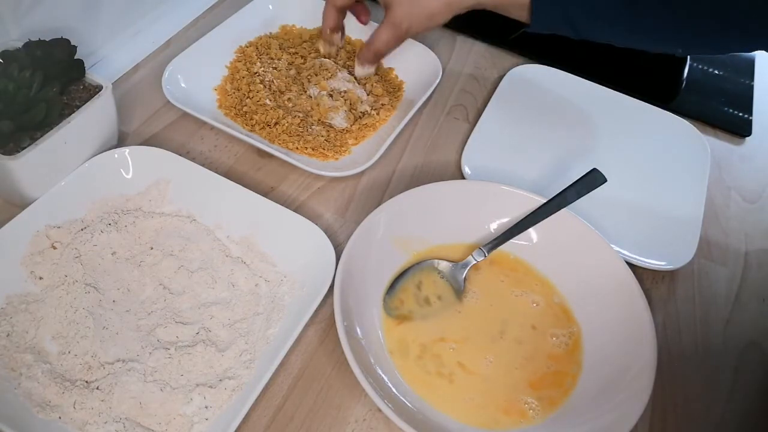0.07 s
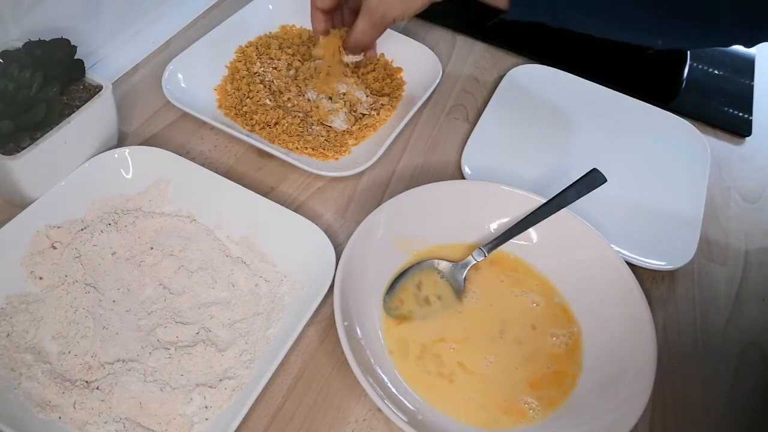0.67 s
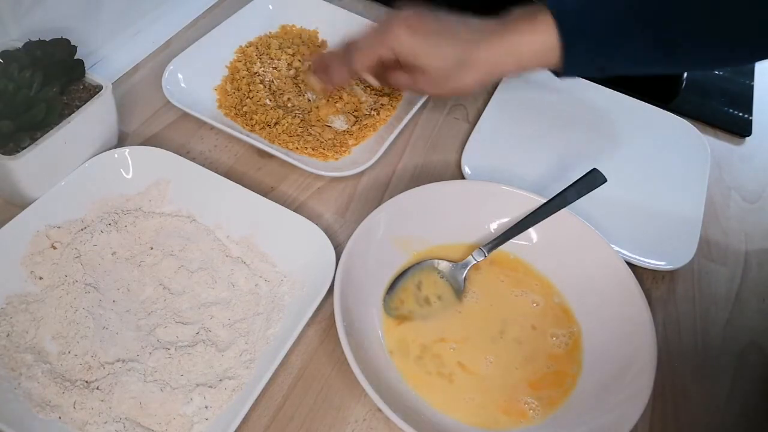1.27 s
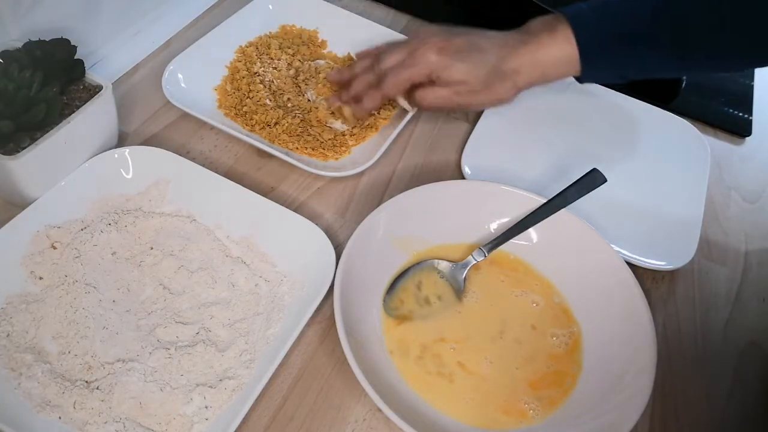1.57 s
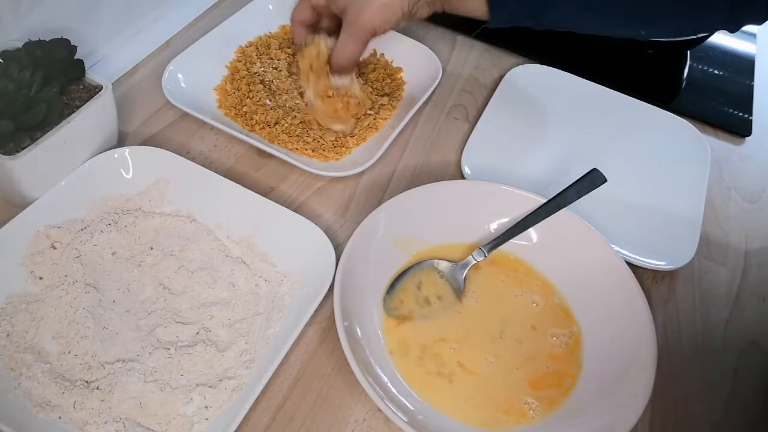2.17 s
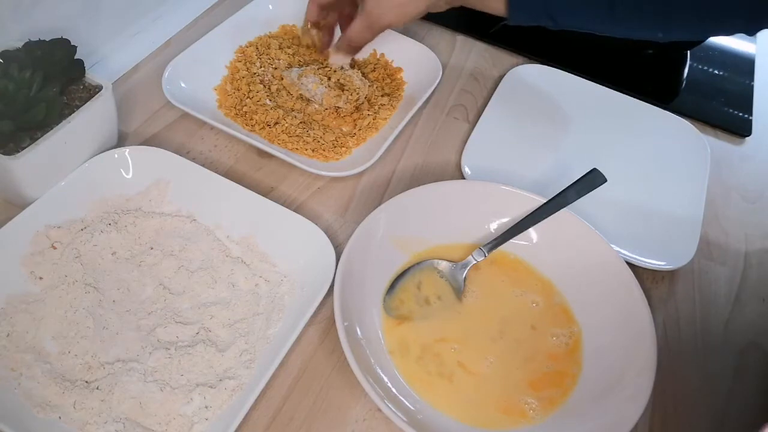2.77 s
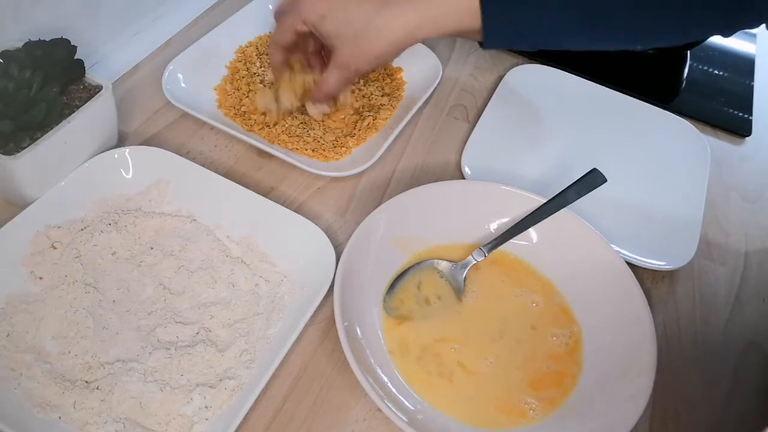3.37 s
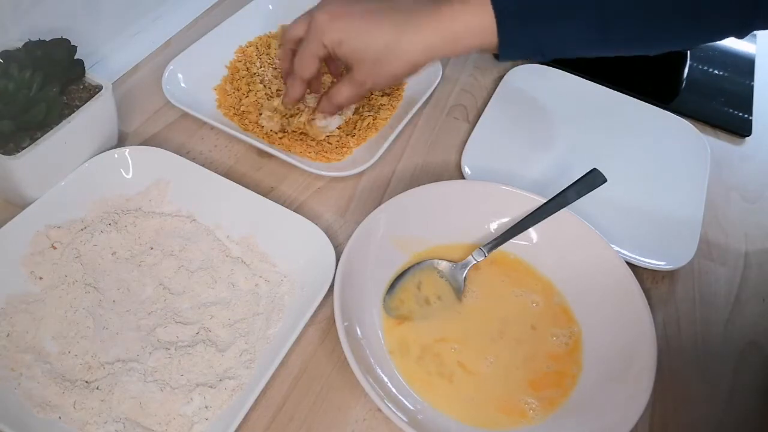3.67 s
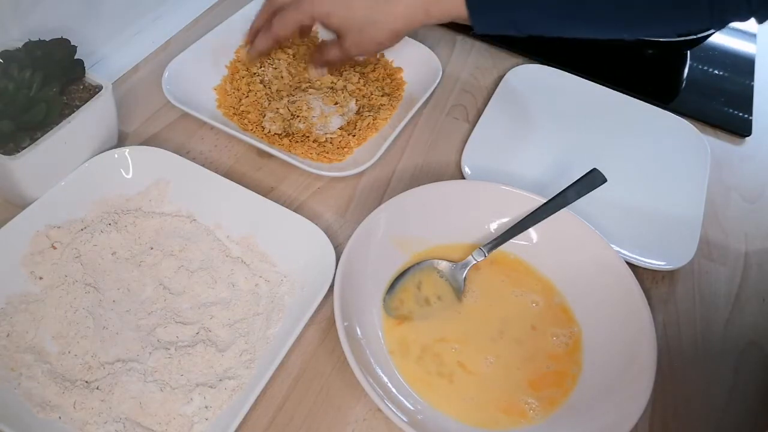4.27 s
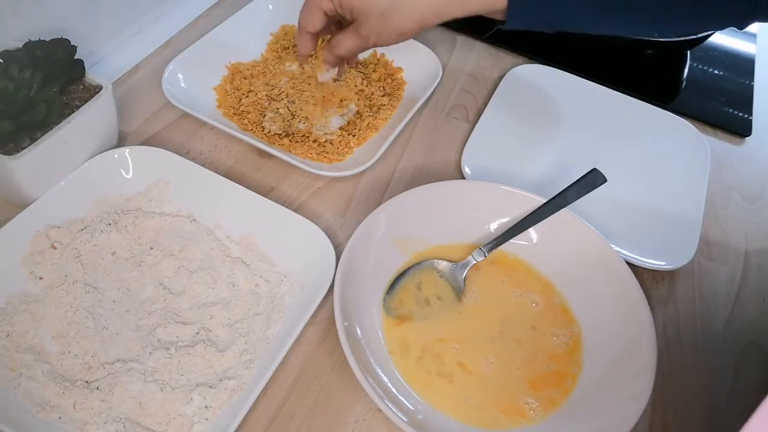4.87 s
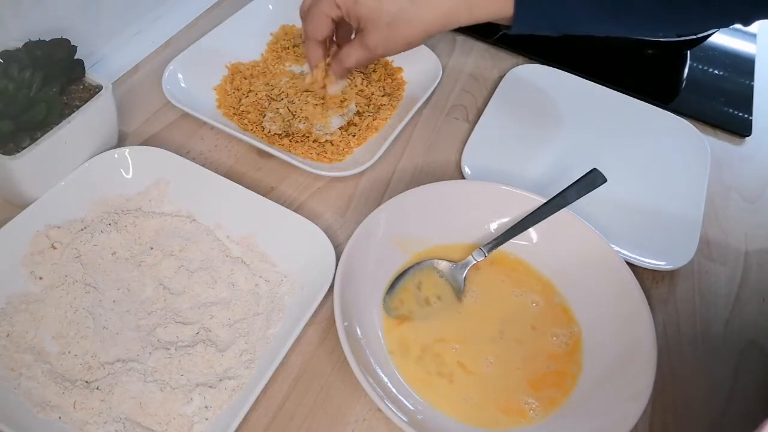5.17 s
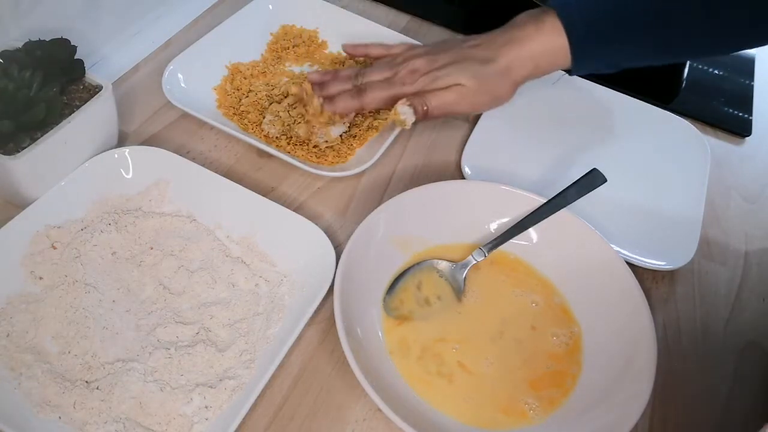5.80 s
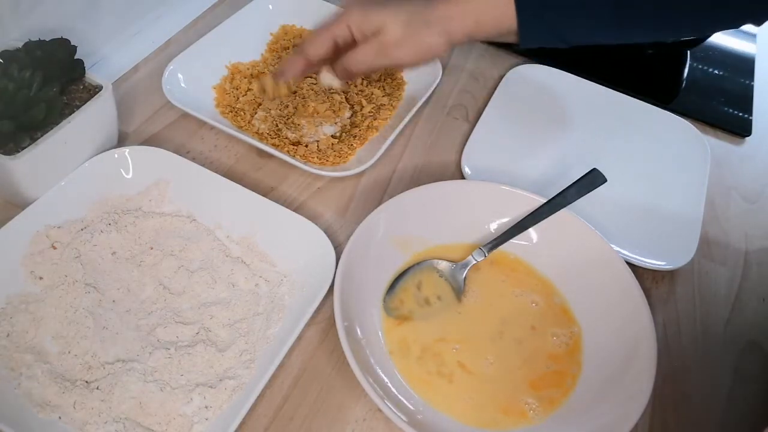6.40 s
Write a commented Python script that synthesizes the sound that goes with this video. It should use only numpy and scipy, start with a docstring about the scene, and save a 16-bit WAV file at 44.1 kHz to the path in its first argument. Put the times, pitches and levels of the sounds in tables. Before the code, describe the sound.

In a small kitchen, a low electrical hum and fan noise continue throughout. Nearby, dry crumbs crackle quietly as meat is pushed and turned in them, lightly scraping and ringing a china plate. Loose crumbs trickle back between pushes, with a longer, ticking sprinkle past the middle. Near the end come a few firmer pats and a soft, dull thud.

```python
"""Dry crumbs crackle as a hand turns pieces of chicken in them on a china plate.
Each push crushes crumbs and rings the plate; loose crumbs trickle back with a finer hiss,
and the meat bumps dully. The hard walls of a small kitchen scatter the crackle.
Underneath: appliance hum, a faint electronic whine and fan rush."""
import sys
import numpy as np
from scipy import signal
from scipy.fft import rfft, irfft, next_fast_len
from scipy.io import wavfile
from scipy.ndimage import map_coordinates

SR = 44100
rng = np.random.default_rng(int(sys.argv[2]) if len(sys.argv) > 2 else 0)


def bounce(signal):
    """Save signal as a 16-bit WAV file at the path given by the first command-line argument."""
    frames = np.transpose(np.atleast_2d(signal))
    limited = np.clip(frames, -1, 1)
    pcm = np.round(limited * 32767).astype(np.int16)
    wavfile.write(sys.argv[1], SR, pcm)


N = 288414

# breaking crumbs (frequency [Hz], gain [dB])
CRUSH_SPECTRUM = [(300, -0.5), (700, -3.5), (1150, -9.5), (1500, -6.5), (2100, -1), (2800, -1), (3700, 1),
                  (4200, -3.5), (4700, 0.5), (6000, 0.5), (8000, -5.5), (11000, -12), (15000, -21)]
# falling crumbs (frequency [Hz], gain [dB])
TRICKLE_SPECTRUM = [(1500, -21), (4200, -9.5), (5500, -6), (7300, -1.5), (8700, -3.5), (10500, -1),
                    (11800, -5.5), (13000, -8.5), (15000, -12)]
def crumbs(crush_db, trickle_db):
    """Crumbs break and trickle down; harder work gives more impulses per second."""
    crush = coloured(fractures(9000 * amp(0.6 * (crush_db + 60)), spread_db=3.5), CRUSH_SPECTRUM)
    dust = fractures(12000 * amp(0.6 * (trickle_db + 58.5)), spread_db=5)
    whole_crumbs = fractures(250, spread_db=-2)
    trickle = coloured(dust + amp(-7.5) * whole_crumbs, TRICKLE_SPECTRUM)
    clumps_db = 1.04 * wobble(70)  # crumbs give way in clusters
    return amp(crush_db + clumps_db + 3.5) * crush + amp(trickle_db + clumps_db + 2) * trickle


# pushes, grabs, pats (start [s], rise [s], hold [s], crush [dB], trickle [dB], ring [dB])
PUSHES = [(0.01, 0.036, 0.03, -53, -53.5, -59.5), (0.369, .14, 0.071, -55.5, -52, -62),
          (1.405, 0.015, 0.07, -64.5, -60, -70.5), (1.562, 0.028, 0.005, -59, -56.5, -66),
          (1.918, 0.02, 0.069, -59, -59, -65), (2.003, 0.046, .05, -61, -59.5, -70),
          (2.122, 0.021, .03, -55.5, -53.5, -57), (2.502, 0.016, 0.085, -62.5, -59, -60.5),
          (2.99, 0.046, .11, -61, -63, -64), (3.194, 0.025, 0.062, -60.5, -61.5, -68.5),
          (3.374, 0.015, 0.019, -63, -64, -73), (3.42, 0.058, 0.026, -59.5, -58, -62),
          (3.726, 0.047, 0.013, -56.5, -56.5, -59), (3.847, 0.03, .02, -76, -70, -73.5),
          (3.995, 0.029, 0.013, -59.5, -59.5, -64), (4.395, 0.034, 0.073, -55.5, -53.5, -52),
          (4.489, 0.032, 0.056, -53.5, -50, -52.8), (4.926, 0.023, 0.028, -65, -51.5, -87),
          (5.696, 0.11, 0.015, -53.5, -55.5, -57), (5.997, 0.021, 0.032, -59, -57.5, -61.5),
          (6.192, 0.032, 0.01, -55.5, -53.3, -59), (6.366, 0.014, 0.024, -59.5, -63.5, -62)]
# crumbs running off a lifted piece (start [s], length [s], level [dB])
SPILLS = [(0.605, 0.3, -61.5), (0.854, 0.26, -61), (2.202, .28, -64), (3.29, 0.076, -69), (3.554, .15, -69),
          (4.566, 0.45, -57.5), (5.074, 0.1, -65), (5.259, 0.2, -66.5)]
def hand():
    """Crush, trickle and ring levels in dB: resting fingers, pushes and spills add in power."""
    resting_db, spill_mix_db = (-81.5, -86, -89), (-7.5, 0, -25)
    ring_lag_s = 0.013  # fingers reach the china late
    power = np.outer(amp(resting_db) ** 2, np.ones(N))
    for start_s, rise_s, hold_s, crush_db, trickle_db, ring_db in PUSHES:
        press = stroke(start_s, rise_s, hold_s, release_db_per_s=330)
        settle = amp(-9.5) * stroke(start_s, rise_s, hold_s, release_db_per_s=133)
        work = np.maximum(press, settle)
        grind = stroke(start_s + ring_lag_s, rise_s, hold_s, release_db_per_s=229)
        power += np.array([amp(crush_db) * work, amp(trickle_db) * work, amp(ring_db) * grind]) ** 2
    spill_rise_s = 0.044
    for start_s, length_s, db in SPILLS:
        flow = amp(db) * stroke(start_s, spill_rise_s, length_s - spill_rise_s, release_db_per_s=94)
        power += np.outer(amp(spill_mix_db), flow) ** 2
    return 10 * np.log10(power)


# single crumbs (time [s], level [dB])
SNAPS = [(0.0667, -51), (0.9702, -43), (1.058, -42), (2.3471, -42), (4.14, -51.5), (4.8748, -39),
         (4.9544, -38), (5.1564, -43), (5.1894, -46.5), (5.3138, -53), (5.3338, -46), (5.3794, -52),
         (5.4136, -47.5), (5.5268, -48.5), (5.5877, -47.5), (5.9878, -45.5)]
def snaps():
    """Larger crumbs break or drop with a crisp tick."""
    return bursts(SNAPS, TRICKLE_SPECTRUM, t60_s=0.0078, gain_db=11.5)


# china modes (frequency [Hz], width [Hz], fingertip gain [dB], palm gain [dB])
PLATE_MODES = [(1073, 35, -10.5, -7.5), (1337, 26, -14, -7), (1731, 60, -10, -12), (1782.6, 13, 3.5, -6),
               (1900, 15.4, 2, 1.5), (2010, 42, -14, -3), (2240, 39, -26, -7.5), (2570, 120, -26, -12),
               (3160, 20, -6.5, -7), (3250, 18, -3, -1), (3620, 40, -4, -18), (4530, 20, -4.5, -10),
               (4700, 20, -9, -6)]
def plate(ring_db, palm_from_s=5.65):
    """Scraping crumbs ring the china; fingertips and flat palm favour different modes."""
    def ring(touch):
        def response(hz):
            return sum((-1) ** k * amp(gains_db[touch]) * 1j * hz * width_hz
                       / (mode_hz ** 2 - hz ** 2 + 1j * hz * width_hz)
                       for k, (mode_hz, width_hz, *gains_db) in enumerate(PLATE_MODES))
        return unit(filtered(scrape, response))
    scrape = np.array([fractures(3000, spread_db=9) for channel in range(2)])
    fingertips, palm = ring(0), ring(1)
    return amp(ring_db + 2) * np.where(np.arange(N) / SR > palm_from_s, palm, fingertips)


# hard crumbs catching on the glaze (time [s], level [dB], mode [Hz])
CATCHES = [(0.036, -47.5, 3250), (0.044, -47.5, 1785), (0.455, -51.5, 1900), (0.473, -49, 3250),
           (2.14, -54, 4500), (2.34, -57, 3255), (2.531, -46.5, 3275), (3.02, -54, 4500), (3.06, -55, 4480),
           (3.11, -54, 3220), (4.5, -50, 3250), (4.544, -45, 4560), (4.562, -48, 3250), (5.8, -47, 3250)]
def catches(rise_s, t60_s):
    """A brief stick-slip swells one plate mode, which then dies away."""
    out, t = np.zeros((2, N + SR)), np.arange(SR // 5) / SR
    swell = (1 - np.exp(-(t / rise_s) ** 2)) * amp(-60 * t / t60_s)
    swell /= swell.max()
    stereo_rad = np.array([[0], [np.pi / 2]])
    for time_s, db, hz in CATCHES:
        phase = 2 * np.pi * (hz * t + rng.random()) + stereo_rad
        out[:, round(time_s * SR):][:, :len(t)] += amp(db - 2) * swell * np.sin(phase)
    return out[:, :N]


# meat on crumbs (frequency [Hz], gain [dB])
THUD_SPECTRUM = [(120, -23), (260, -9), (370, 14), (440, 11.5), (620, 5.5), (800, -20), (1500, -30)]
# meat shoved along (start [s], length [s], level [dB])
SHOVES = [(0.377, 0.43, -62.5), (0.913, 0.2, -66), (1.896, 0.61, -63), (2.108, .28, -58),
          (3.73, 0.19, -58.5), (4.377, 0.22, -61.5), (5.69, .2, -59.5), (5.972, 0.19, -61.5),
          (6.17, 0.33, -58)]
# meat flopping down (time [s], level [dB])
FLOPS = [(2.164, -60), (2.9, -48.5), (5.805, -38), (6.141, -51)]
def meat():
    """Soft pieces rub and bump on the crumb bed; each shove is a half-sine swell."""
    t = np.arange(N) / SR
    push = sum(amp(db) * np.sin(np.pi * np.clip((t - start_s) / length_s, 0, 1))
               for start_s, length_s, db in SHOVES)
    rub = push * coloured(fractures(1500, spread_db=3.5), THUD_SPECTRUM)
    return rub + bursts(FLOPS, THUD_SPECTRUM, t60_s=0.0096, gain_db=17)


# room decay (frequency [Hz], T60 [s])
KITCHEN_T60 = [(300, 0.48), (2000, 0.51), (6000, 0.31), (14000, 0.28)]
def kitchen(x, early_db, early_t60_s, tail_db, spots, hops_per_s=90):
    """Direct sound, early reflections off counter and dishes, and room tail; keeps the power of x."""
    t = np.arange(SR // 4) / SR
    position = np.arange(N) / SR * hops_per_s
    wet = np.zeros((2, N))
    for spot in range(spots):  # the sound hops about the plate; each spot has its own echoes
        hz, age_s, noise = signal.stft(rng.standard_normal((2, len(t))), SR, nperseg=256)
        decay = amp(-60 * age_s / along(KITCHEN_T60, hz)[:, None])
        tail = signal.istft(noise * decay, SR, nperseg=256)[1][:, :len(t)]
        early = rng.standard_normal(tail.shape) * amp(-60 * t / early_t60_s)
        echo = (amp(tail_db) * unit(tail) + amp(early_db) * unit(early)) / np.sqrt(len(t))
        share = np.sin(np.pi / 2 * np.minimum((position - spot) % spots, 2))
        wet += signal.oaconvolve((x * share)[None], echo, axes=1)[:, :N]
    direct = np.array([x, np.roll(x, 5)])  # right lags 5 samples
    return (direct + wet) / np.sqrt(1 + amp(early_db) ** 2 + amp(tail_db) ** 2)


# motor and mains lines (frequency [Hz], level [dB], unsteadiness [0-1])
HUM_LINES = [(49.8, -55, 0.14), (84.3, -58, 0), (100, -41.5, 0.09), (118, -78, 1), (199, -68.5, 0.54),
             (435, -74, 1), (473, -66, 0.96), (551.5, -76.5, 0.88), (593.5, -69.5, 0.84), (841, -82, 0.3),
             (907, -81.5, 0.55), (1337, -73.5, 0.28), (1385, -80.5, 0.27)]
# motor drone (time [s], level [dB])
DRONE_LEVELS = [(0.0, -65), (0.2, -55.5), (0.87, -63.5), (0.89, -84), (1.26, -57.5), (2.62, -55.5),
                (2.71, -65.5), (3.04, -54.5), (3.13, -69.5), (3.71, -55.5), (4.11, -71), (4.15, -59),
                (5.23, -61.5), (5.26, -52.5), (5.68, -70.5), (5.74, -58), (6.45, -55.5), (6.54, -72)]
def appliances(drone_hz=232.7):
    """Motor and mains lines waver in level and phase; one motor drone swells and fades."""
    t = np.arange(N) / SR
    hum = np.zeros(N)
    for hz, db, unsteady in HUM_LINES:
        drift = (wobble(9.7) + 1j * wobble(9)) / np.sqrt(2)
        carrier = np.exp(2j * np.pi * (hz * t + rng.random()))
        hum += amp(db) * unit(np.real((1 - unsteady + unsteady * drift) * carrier))
    drone_db = np.interp(t, *np.transpose(DRONE_LEVELS))
    drone = amp(drone_db - 1) * unit(np.cos(2 * np.pi * drone_hz * t + 0.7 * wobble(6)))
    return (amp(-2) * hum + drone) * amp([[0.3], [-0.3]])  # slightly left


# electrical tones (frequency [Hz], rms level [dB])
WHINE_LINES = [(3763, -90.5), (5001, -90.5), (5997, -88.5), (6498, -91), (7500, -99), (8000, -111),
               (9496, -92)]
def whine():
    """Thin steady tones from electronics."""
    t = np.arange(N) / SR
    return sum(amp(db) * unit(np.sin(2 * np.pi * (hz * t + rng.random()))) for hz, db in WHINE_LINES)


# fan rush (frequency [Hz], gain [dB])
FAN_SPECTRUM = [(25, -5), (60, -3), (105, 10), (160, -5), (280, -2.5), (450, -7), (750, -14), (1200, -19.5),
                (1900, -23.5), (3500, -30.5), (6000, -39.5), (10000, -39), (11500, -53), (15000, -50)]
# left-right likeness (frequency [Hz], coherence [0-1])
FAN_COHERENCE = [(100, 0.69), (290, 0.63), (600, 0.2), (1200, 0.013), (8000, 0.04)]
def fan(level_db):
    """Fan rush fills the room: left and right alike in the bass, unrelated in the treble."""
    def mid_side_gains(hz):
        angle = np.arccos(along(FAN_COHERENCE, hz)) / 2
        return np.array([np.cos(angle), np.sin(angle)])
    mid, side = filtered(rng.standard_normal((2, N)), mid_side_gains)
    return amp(level_db) * coloured(np.array([mid + side, mid - side]), FAN_SPECTRUM)


def fractures(rate_per_s, spread_db):
    """Random impulses of log-normal size, at steady mean power."""
    chance = np.clip(rate_per_s / SR, 1e-4, 1)
    sizes = amp(spread_db * np.minimum(rng.standard_normal(N), 2)) * rng.choice([-1, 1], N)
    return unit((rng.random(N) < chance) * sizes / np.sqrt(chance))


def bursts(events, spectrum, t60_s, gain_db):
    """One decaying, filtered noise burst per event."""
    out, t = np.zeros(N + SR), np.arange(SR // 10) / SR
    for time_s, db in events:
        burst = rng.standard_normal(len(t)) * amp(-60 * t / t60_s)
        out[round(time_s * SR):][:len(t)] += amp(db + gain_db) * burst / np.abs(burst).max()
    return filtered(out[:N], lambda hz: amp(along(spectrum, hz)))


def stroke(start_s, rise_s, hold_s, release_db_per_s):
    """Envelope: linear rise to 1, hold, exponential release."""
    age_s = np.arange(N) / SR - start_s
    rise = np.clip(age_s / max(rise_s, 1e-3), 0, 1)
    release = amp(-release_db_per_s * np.maximum(age_s - rise_s - hold_s, 0))
    return rise * release * (age_s < 2)


def wobble(knots_per_s):
    """Smooth random curve."""
    knots = rng.standard_normal(int(N * knots_per_s / SR) + 4)
    return map_coordinates(knots, [np.arange(N) * knots_per_s / SR])


def coloured(x, spectrum):
    """x shaped by a spectrum table, at rms 1."""
    return unit(filtered(x, lambda hz: amp(along(spectrum, hz))))


def filtered(x, response):
    """x through a complex frequency response."""
    size = next_fast_len(N + SR // 2)
    return irfft(rfft(x, size) * response(np.fft.rfftfreq(size, 1 / SR)), size)[..., :N]


def along(points, hz):
    """Table lookup on a log frequency axis."""
    knots_hz, values = np.transpose(points)
    return np.interp(np.log(hz + 1), np.log(knots_hz + 1), values)


def amp(db):
    return 10 ** (np.asarray(db) / 20)


def unit(x):
    return x / np.sqrt(np.mean(x ** 2) + 1e-20)


# stereo balance of food and plate (frequency [Hz], left minus right [dB])
BALANCE = [(500, 6), (1300, 7), (1800, -0.5), (3200, 3.5), (5000, 1.5), (8700, 4.5), (10700, -3),
           (14000, -1)]
def scene():
    """Crumbs, meat and plate in the kitchen, over appliance noise."""
    crush_db, trickle_db, ring_db = hand()
    crackle = crumbs(crush_db, trickle_db) + snaps()
    crackle = kitchen(crackle, early_db=2, early_t60_s=0.03, tail_db=0, spots=14)
    bumps = kitchen(meat(), early_db=-22.5, early_t60_s=0.023, tail_db=-2.5, spots=3)
    food = crackle + bumps + plate(ring_db) + catches(rise_s=0.0076, t60_s=0.064)
    food = filtered(food, lambda hz: amp(np.outer([0.5, -0.5], along(BALANCE, hz))))
    return food + appliances() + whine() + fan(level_db=-55)


def record(dry):
    """Brick-wall low-pass."""
    cutoff_hz = 15250
    return filtered(dry, lambda hz: hz < cutoff_hz)


dry = scene()
out = record(dry)
bounce(out)
```